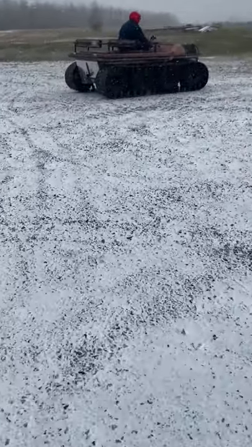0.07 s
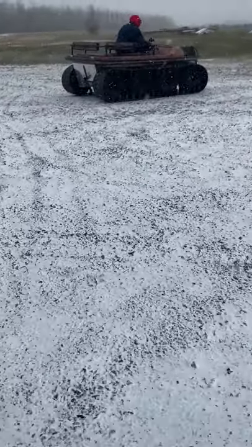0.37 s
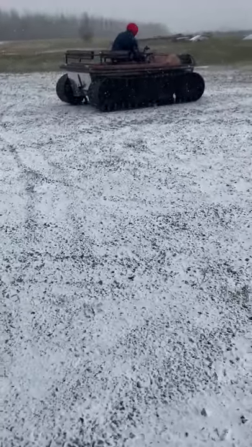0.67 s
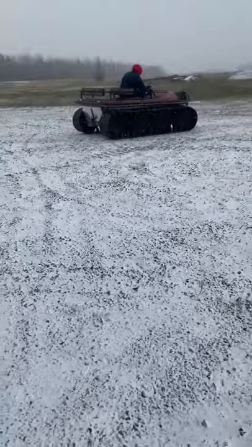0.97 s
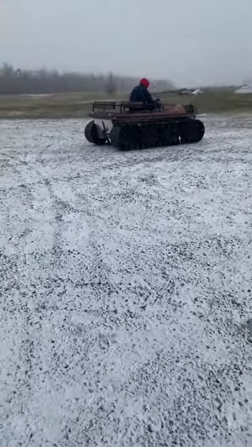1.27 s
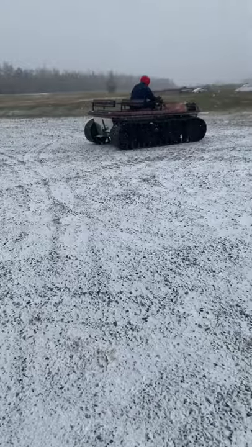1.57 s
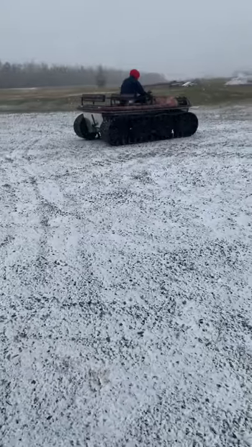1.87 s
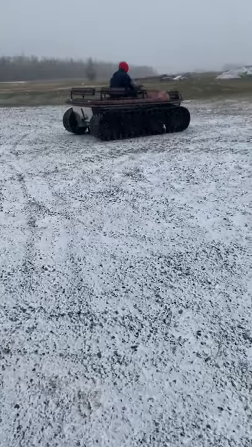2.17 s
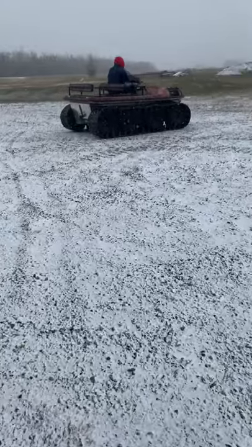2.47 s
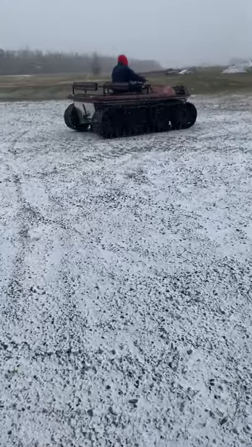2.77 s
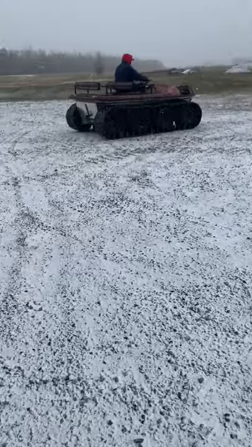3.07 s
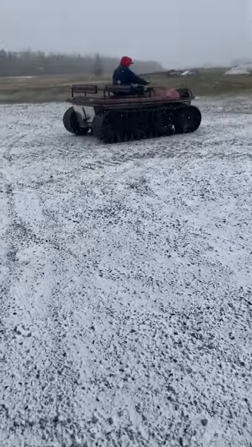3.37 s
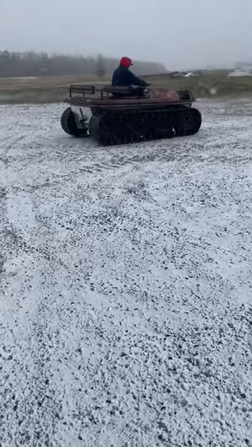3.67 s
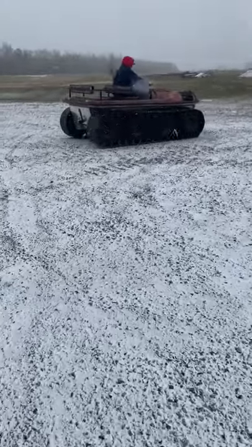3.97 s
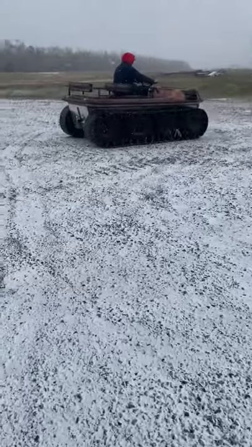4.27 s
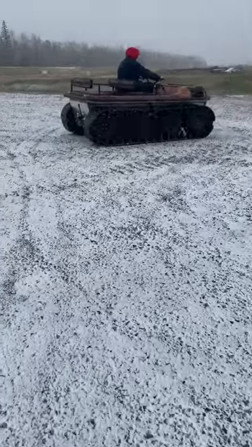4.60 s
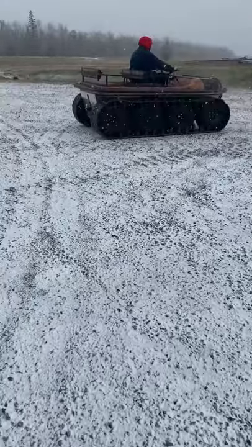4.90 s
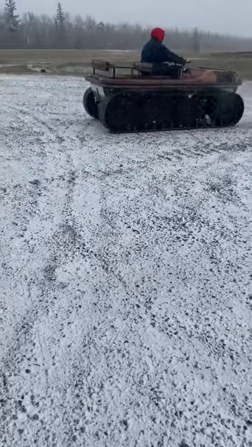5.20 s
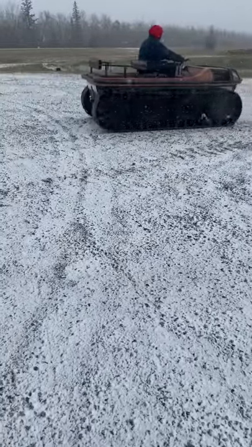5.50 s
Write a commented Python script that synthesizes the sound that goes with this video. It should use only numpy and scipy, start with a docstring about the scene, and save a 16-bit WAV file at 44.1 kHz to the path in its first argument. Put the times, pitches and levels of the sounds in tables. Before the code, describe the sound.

A small tracked vehicle thuds at idle, then revs up and drives off with knocking tracks, amid wind buffets and boots crunching on snow.

```python
"""A V-twin thuds at idle some metres away: a small tracked vehicle in a snowy field revs up and drives off.
Exhaust pulses ring the muffler and merge into a drone under load. The valve gear clatters, a puff of
hiss rings the casing once a cycle, and track links knock as they roll. Close by, wind buffets the
microphone, boots crunch on frozen snow and a few ice pellets tick."""
import sys
import numpy as np
from scipy import signal
from scipy.fft import rfft, irfft, next_fast_len
from scipy.io import wavfile

SR = 44100
rng = np.random.default_rng(int(sys.argv[2]) if len(sys.argv) > 2 else 0)


def master(y):
    """Save y as 16-bit WAV."""
    cut = np.clip(np.atleast_2d(y).T, -1, 1)
    pcm = np.round(cut * 32767)  # scale
    wavfile.write(sys.argv[1], SR, pcm.astype(np.int16))


N = 244314
T = np.arange(N) / SR
HZ = np.fft.rfftfreq(N, 1 / SR)

# engine speed, hunting at idle, then climbing in three pushes (time [s], four-stroke cycle rate [Hz])
CYCLE_RATE = [(0.0, 11.93), (0.6, 11.3), (1.0, 11.06), (1.5, 10.71), (1.85, 11.46), (2.35, 10.43),
              (2.65, 11.24), (3.05, 10.84), (3.28, 12.25), (3.45, 18.32), (3.7, 23.22), (3.95, 22.88),
              (4.2, 25.36), (4.5, 28.83), (4.75, 29.52), (5.0, 29.61), (5.25, 32.69), (5.54, 34.64)]
# the driver opens up, eases off, opens up again (time [s], throttle [0-1])
THROTTLE = [(3.2, 0), (3.38, .8), (3.7, .75), (4.3, .85), (4.55, .5), (4.95, .45), (5.04, 1), (5.3, .92),
            (5.54, .7)]
# layer gain laws (idle [dB], added at full throttle [dB], per doubling of speed [dB])
EXHAUST_LAW = (-27.3, 7, -4.8)
CLATTER_LAW = (-47, 0.081, 12.6)
HISS_LAW = (-53.5, 4.1, 6.3)
TICK_LAW = (-36.5, 10, -5)
# exhaust strokes (phase [cycles], gain [dB])
STROKES = [(0.09, 0), (0.485, -5.5)]
# swell and sag of the exhaust beat (time [s], gain [dB])
BEAT_SWELL = [(0, -3), (1.65, 0.5), (2.3, 0), (2.62, -3.5), (3.2, 2)]
# muffler resonances (frequency [Hz], width [Hz], gain [dB])
MUFFLER_MODES = [(73.3, 4.3, 9), (109.6, 43.5, 7.5), (171, 32, -1.5), (229, 71, -3)]
# engine orders entering the pipe (order [x cycle rate], full-throttle level [dB], loss when shut [dB])
DRONE_ORDERS = [(2, -17.3, 7), (3, -28.5, 0), (4, -28, 2), (5, -18.5, 10), (6, -19.8, 22), (7, -30.5, 5),
                (8, -31.5, 0), (9, -35.5, 0), (10, -35, 3), (11, -33, 6)]
# exhaust pipe response (frequency [Hz], gain [dB])
PIPE_RESPONSE = [(35, -21), (47, -15), (53, -8), (59, -6.5), (66, .5), (70, .5), (79, -5), (95, -3),
                 (117, .5), (135, -1), (152, -.5), (163, -5), (172, -10), (180, .5), (187, 0), (198, -3),
                 (210, -13), (240, -1), (300, -7), (380, -16)]
# valve rattles and hiss puffs (phase [cycles], decay [cycles], power [x steady part])
VALVE_BURSTS = [(0.99, 0.054, 1.1), (0.153, 0.08, 0.19), (0.37, 0.016, 1.5), (0.64, 0.074, 0.22)]
PUFF_BURSTS = [(.96, .055, 85), (.36, .07, 3.5)]
# spectra of clatter, hiss and the struck engine block (frequency [Hz], relative level [dB])
IDLE_CLATTER_SPECTRUM = [(100, -20), (300, -9), (450, -3), (620, 1), (760, 10), (900, 9), (1100, 6.5),
                         (1400, 5.5), (1700, 1), (2100, -6), (2600, -11), (3300, -11), (5000, -13.5),
                         (9000, -45)]
LOAD_CLATTER_SPECTRUM = [(100, 7), (300, 8.5), (450, 2.5), (700, 2), (1100, -1), (1450, -6.5), (1750, -6.5),
                         (2080, -8), (2350, -15), (2700, -15.5), (3300, -19.5), (4100, -24), (5200, -23),
                         (9000, -33)]
HISS_SPECTRUM = [(500, -8), (1500, 3), (2700, 3), (4100, 6.5), (5200, 1), (6600, 5), (7500, 5), (8500, 3),
                 (11000, 5), (13000, 3), (15800, -7.5)]
BLOCK_SPECTRUM = [(300, 3), (1000, 2), (1550, 6), (2600, -9), (4000, -9.5), (5200, -15), (9000, -13),
                  (15000, -23)]
# resonances of thin metal round the engine (frequency [Hz], width [Hz], gain [dB])
CASING_MODES = [(1663, 120, 14.5), (2105, 40, 21), (2608, 110, 18), (2903, 53, 18), (3870, 180, 9.5),
                (3990, 68, 3.5), (5610, 130, 12.5), (6500, 100, 5.5), (8260, 110, 11.5), (8860, 120, 10),
                (10200, 300, 4.5)]
# hard firings as the throttle opens (time [s], peak into the block [dB])
HARD_FIRINGS = [(3.157, -28), (3.241, -25), (3.390, -24), (3.449, -24), (3.500, -22), (3.562, -22),
                (3.647, -22)]
# track knocks (time [s], peak [dB], pitch of the struck spot [Hz])
KNOCKS = [(3.608, -20, 1070), (3.753, -20, 635), (4.274, -18, 796), (4.386, -18, 1080), (4.58, -22, 845),
          (4.666, -13.5, 593), (4.848, -17, 687), (4.884, -15, 1230), (5.0, -19, 980), (5.156, -16.5, 814),
          (5.303, -17.5, 940), (5.381, -22, 1050), (5.455, -13, 910)]
# running gear resonances (frequency [Hz], width [Hz], gain [dB])
CHASSIS_MODES = [(590, 160, 12), (720, 130, 8), (1140, 170, 10), (1490, 300, 13.5), (2050, 200, 7)]
# hull reflections (delay [s], gain [ratio])
HULL_ECHOES = [(.00238, -0.18), (.0037, 0.058)]
# pitch the ground bounce cancels, sinking as listener and vehicle move (time [s], frequency [Hz])
GROUND_NOTCH = [(0, 820), (1.15, 784), (1.7, 690), (2.6, 575), (4.2, 607), (5.4, 440)]
# gusts on the microphone (start [s], length [s], level [dB], cutoff [Hz])
GUSTS = [(0.0, 0.095, -30, 271), (0.244, 0.056, -32.5, 465), (0.333, 0.058, -29, 600),
         (0.449, 0.14, -28, 520), (0.613, 0.04, -26, 960), (0.667, 0.056, -23, 1300),
         (0.772, 0.033, -25.5, 965), (0.836, 0.043, -26.5, 755), (0.971, 0.021, -27, 580),
         (1.17, 0.19, -36, 400), (1.283, 0.12, -30, 520), (1.455, 0.055, -28.5, 520),
         (1.561, 0.052, -28.5, 690), (1.604, 0.038, -30, 380), (1.747, 0.053, -34, 460),
         (1.848, 0.11, -32, 447), (1.985, 0.12, -33.5, 594), (2.399, 0.052, -33, 328),
         (3.298, 0.075, -29, 620)]
# slaps of air (time [s], peak [dB])
SLAPS = [(0.337, -17), (.372, -25), (.505, -24), (.674, -13), (.70, -19), (.734, -18), (.794, -18),
         (1.287, -22), (1.47, -23), (1.599, -15.5), (1.879, -21), (2.046, -22), (2.089, -22), (3.319, -24)]
# low shoves of air (time [s], frequency [Hz], decay [s], gain [dB])
THUMPS = [(0.513, 44.3, 0.04, -20), (1.462, 42.3, 0.046, -15.5)]
# wind spectra (frequency [Hz], relative level [dB])
EDDY_SPECTRUM = [(20, -48), (45, -1), (120, 5.5), (250, 0.5), (450, -5.5), (800, -15), (1200, -27),
                 (2000, -40), (5000, -60)]
SLAP_SPECTRUM = [(40, -8), (150, 0), (350, -2), (700, 1.5), (1100, -3), (1600, -18), (3000, -36),
                 (6000, -70)]
RUMBLE_SPECTRUM = [(15, -62), (35, 3.5), (60, -5), (90, -2.5), (150, -12.5), (300, -24.5), (1000, -60)]
# boots in snow (start [s], length [s], level [dB], tilt [dB/octave])
STEPS = [(0.259, 0.059, -46.5, -1), (0.399, 0.027, -34, -5), (0.819, 0.11, -41, -0.5),
         (0.901, 0.17, -40, -1), (0.944, 0.053, -35.5, -1), (1.179, 0.022, -44, 2),
         (1.493, 0.098, -40.5, 1), (1.732, 0.074, -47, -0.5), (1.858, 0.024, -47.5, 2),
         (2.236, 0.2, -43.5, -1), (2.436, 0.06, -42, -1.5), (2.87, 0.09, -43.5, 3), (2.942, 0.17, -39, 0),
         (3.554, 0.13, -42, 0.5)]
# snow crunch spectrum (frequency [Hz], relative level [dB])
CRUNCH_SPECTRUM = [(150, 44), (500, 9.5), (1000, 15.5), (1900, 10), (2600, 5), (3900, 4), (5200, 1),
                   (8000, -1), (12000, -5.5), (16000, -8)]
# loudest crusts and stones snapping underfoot (time [s], pitch [Hz], peak [dB])
LOUD_SNAPS = [(0.334, 3550, -31.5), (0.403, 3430, -24.5), (0.42, 3470, -29), (0.83, 2680, -28.5),
              (0.839, 2830, -25.5), (0.881, 2470, -23.5), (0.903, 2480, -29), (0.935, 2910, -27),
              (0.981, 2000, -24), (1.001, 2340, -28), (1.03, 2400, -30), (1.043, 1790, -23),
              (1.107, 1640, -32), (1.705, 1200, -31.5), (1.868, 1090, -34), (2.233, 1880, -27),
              (2.334, 1543, -30), (2.452, 1376, -31), (2.885, 1314, -24.5), (2.92, 1746, -24.5),
              (2.959, 1980, -31), (3.032, 1700, -32), (3.052, 1290, -22), (3.616, 3660, -27)]
# ice pellets landing near the microphone (time [s], peak [dB])
PELLETS = [(2.287, -19), (2.96, -17.5), (3.081, -28), (3.169, -23), (3.263, -22), (3.393, -24),
           (3.449, -14), (3.499, -18.5), (3.69, -41)]
# likeness of the two microphone ports (frequency [Hz], coherence [0-1])
PORT_COHERENCE = [(50, 0.84), (300, 1), (700, 0.68), (1900, 0.66), (2900, 0.5), (4000, 0.2), (6000, 1),
                  (8300, 0.96), (12000, 1), (15000, 1)]
# lead of the left port (frequency [Hz], phase [rad])
PORT_LEAD = [(0, 0), (1000, -.4), (2200, .3), (3200, 2.3), (4700, 2.7), (6400, 5.1), (8500, 6.4),
             (12000, 9.4), (16000, 12.7)]


def exhaust(cycles, cycle_hz, jitter_s=.0011, uneven=.35, echo_s=.021, echo_gain=.18, width=.31):
    """Each cylinder sends a pulse and a gush of turbulence into the muffler's resonances."""
    pulses, gush = np.zeros(N), np.zeros(N)
    for phase, db in STROKES:
        at = crossings(cycles, phase)
        size, late = rng.uniform(-1, 1, (len(at), 2)).T
        merged = np.clip((cycle_hz[at] - 14) / 8, 0, 1)  # at speed the pulses' even part is the drone
        strength = 1 - merged + (uneven + merged) * size
        jittered = np.clip(at + (late * jitter_s * SR).astype(int), 0, N - 1)
        pulses[jittered] += amp(db) * strength / np.sqrt(cycle_hz[at])
        gush += amp(db) * np.exp(-((cycles - phase) % 1) / 1.8)
    turbulence = evened(gush * rng.standard_normal(N))
    rough_share = np.interp(cycle_hz, [13, 22], [.25, .85])
    drive = np.sqrt(1 - rough_share) * evened(pulses) + np.sqrt(rough_share) * turbulence
    ring = sum(amp(db) * width_hz * mode(hz, width_hz, T[:SR // 4]) for hz, width_hz, db in MUFFLER_MODES)
    muffled = signal.fftconvolve([drive, rng.standard_normal(N)], ring[None], axes=1)[:, :N]
    outlet = signal.butter(2, [45, 300], "bandpass", fs=SR, output="sos")
    pipe = rfft(signal.sosfilt(outlet, muffled))
    echo = 1 + echo_gain * np.exp(-2j * np.pi * HZ * echo_s)  # idle thuds return once from the muffler
    round_idle = evened(irfft(pipe * echo / (1 + (HZ / 160) ** 4), N))
    hard_load = evened(irfft(pipe * HZ / np.hypot(HZ, 140), N))
    revving = np.clip((cycle_hz - 12) / 4, 0, 1)
    thud, side = (evened(x) for x in (1 - revving) * round_idle + revving * hard_load)
    gain = amp(effort_db(EXHAUST_LAW, cycle_hz) + curve(BEAT_SWELL))
    return gain * (thud + width * np.array([side, -side]))


def drone(cycles, cycle_hz, waver_db=2, smear_cycles=.052, slip_periods=.022):
    """Under load the pipe smears the pulses into wavering engine orders that sweep its resonances."""
    onset = np.interp(cycle_hz, [12.5, 20.5], [0, 1])
    shut = 1 - curve(THROTTLE)
    tones = np.zeros(N)
    for order, db, shut_loss_db in DRONE_ORDERS:
        level_db = db - shut_loss_db * shut + at_hz(PIPE_RESPONSE, order * cycle_hz)
        level_db += waver_db * wander(13)
        delayed = cycles - smear_cycles * order  # higher orders leave the pipe later
        tones += amp(level_db) * np.cos(2 * np.pi * (order * delayed + slip_periods * wander(13)))
    return np.sqrt(2) * onset * tones


def clatter(cycles, cycle_hz, grit_db=1, lag_s=.09):
    """Valve gear and casing rattle in step with the cycle, filling out just after the speed climbs."""
    rattle = bursts(cycles, VALVE_BURSTS, uneven_db=1) * evened(amp(grit_db * wander(110)))
    drive = rng.standard_normal((2, N)) * rattle
    lagged_hz = np.interp(T - lag_s, T, cycle_hz)
    load = np.clip((lagged_hz - 15) / 13, 0, 1)
    blend = (1 - load) * colour(drive, IDLE_CLATTER_SPECTRUM) + load * colour(drive, LOAD_CLATTER_SPECTRUM)
    return amp(effort_db(CLATTER_LAW, lagged_hz)) * blend


def hiss(cycles, cycle_hz, flutter_db=1.8, trim_db=-3.5):
    """One sharp puff and a faint one ring the casing each cycle; at speed they sink into a steadier rush."""
    puffs = bursts(cycles, PUFF_BURSTS, uneven_db=4.5)
    steady_share = np.interp(cycle_hz, [19.5, 22, 29], [0, .35, .6])
    envelope = np.sqrt((1 - steady_share) * puffs ** 2 + steady_share)
    gain = amp(effort_db(HISS_LAW, cycle_hz) + trim_db + flutter_db * wander(500))
    air = colour(rng.standard_normal((2, N)) * envelope * gain, HISS_SPECTRUM)
    metal = sum((amp(db) - 1) * signal.lfilter(*signal.iirpeak(hz, hz / width_hz, SR), air)
                for hz, width_hz, db in CASING_MODES)
    return air + np.interp(cycle_hz, [13, 24], [.74, .47]) * metal


def valve_ticks(cycles, cycle_hz, uneven_db=3):
    """Once a cycle a valve strikes the casing and leaves it ringing."""
    at = crossings(cycles, 0)
    blows, out = np.zeros((2, N)), np.zeros((2, N))
    total = sum(amp(db) * width_hz for _, width_hz, db in CASING_MODES)
    for hz, width_hz, db in CASING_MODES:
        blows[:, at] = amp(uneven_db * rng.standard_normal((len(at), 2)).T)
        ring = amp(db) * width_hz / total * mode(hz, width_hz, T[:SR // 12])
        out += signal.oaconvolve(blows, ring[None], axes=1)[:, :N]
    return amp(effort_db(TICK_LAW, cycle_hz)) * out


def hard_firings(decay_s=.0045):
    """The first charges under an opening throttle knock sharply on the block."""
    out = np.zeros((2, N))
    for time_s, db in HARD_FIRINGS:
        add(out, time_s, peaked(noise_hit(T[:SR // 20], decay_s), db))
    return colour(out, BLOCK_SPECTRUM)


def tracks(scrape_s=.0075, detune=.05, spot_db=20):
    """Track links slap the running gear in short, scraping knocks; each spot adds a broad resonance."""
    out, t = np.zeros((2, N)), T[:SR // 10]
    for time_s, peak_db, spot_hz in KNOCKS:
        modes = [(hz * (1 + detune * rng.uniform(-.76, 1)), width_hz, db)
                 for hz, width_hz, db in CHASSIS_MODES]
        modes.append((spot_hz, spot_hz / 2, spot_db))
        ring = sum(amp(db) * mode(hz, width_hz, t) for hz, width_hz, db in modes)
        knock = signal.fftconvolve(noise_hit(t, scrape_s), ring[None], axes=1)
        add(out, time_s, peaked(knock, peak_db))
    return out


def reflections(x, cycle_hz, ground_gain=.42):
    """Ground and hull echoes give the idling engine a hollow ring that fades as it speeds up."""
    standing = np.interp(cycle_hz, [16, 24], [1, .35])
    out = x.copy()
    for delay_s, gain in HULL_ECHOES + [(.5 / curve(GROUND_NOTCH), ground_gain)]:
        out += gain * standing * np.array([np.interp(T - delay_s, T, channel) for channel in x])
    return out


def wind(lumpy_db=4.2, rumble_db=-33, width=.25):
    """Eddies tumble over the ports above a low rumble and two shoves of air."""
    strength, cutoff_hz = gusts()
    lumps = evened(amp(lumpy_db * np.tanh(wander(66))))
    eddies = colour(rng.standard_normal((2, N)) * lumps, EDDY_SPECTRUM)
    mid, side = strength * low_passed(eddies, cutoff_hz) + slaps()
    mid += amp(rumble_db) * colour(rng.standard_normal(N), RUMBLE_SPECTRUM)
    t = T[:SR // 4]
    for time_s, hz, decay_s, db in THUMPS:
        swell = 2 * t / decay_s * np.exp(1 - 2 * t / decay_s)
        add(mid, time_s, amp(db) * swell * np.sin(2 * np.pi * hz * t))
    return mid + width * np.array([side, -side])


def gusts(rise_s=.01, fall_s=.012, breeze_db=-37.5, breeze_hz=212):
    """Wind gain and power-weighted cutoff: each gust swells, holds and drops back into a light breeze."""
    power = amp(breeze_db) ** 2
    weighted_hz = power * breeze_hz
    for start_s, length_s, db, cutoff_hz in GUSTS:
        before_s, after_s = np.maximum(start_s - T, 0), np.maximum(T - start_s - length_s, 0)
        gust_power = (amp(db) * np.exp(-before_s / rise_s - after_s / fall_s)) ** 2
        power += gust_power
        weighted_hz += gust_power * cutoff_hz
    return np.sqrt(power), weighted_hz / power


def slaps(decay_s=.0024):
    """A tight eddy hits the ports with a short, dull pop."""
    out, t = np.zeros((2, N)), T[:SR // 20]
    shape = amp(at_hz(SLAP_SPECTRUM, np.fft.rfftfreq(len(t), 1 / SR)))
    for time_s, db in SLAPS:
        air = irfft(rfft(rng.standard_normal((2, len(t)))) * shape, len(t))
        pop = air * t * np.exp(-t / decay_s)
        add(out, time_s, amp(db) * pop / abs(pop).max(1, keepdims=True))
    return out


def boots(band_cracks_per_s=450, spread_db=4, rub=.16, q=4, taper=.75):
    """Frozen snow gives way under a sole in a cloud of tiny cracks, ringing in 14 bands."""
    out = np.zeros((2, N))
    band_hz = np.geomspace(500, 14000, 14)[:, None, None]
    for start_s, length_s, db, tilt_db in STEPS:
        count = int(length_s * SR)
        grid = (len(band_hz), 2, count)
        sizes = amp(spread_db * np.minimum(rng.exponential(1, grid), 3))
        sizes *= rng.random(grid) < band_cracks_per_s / SR
        cracks = evened(sizes * rng.choice([-1, 1], grid)) + rub * rng.standard_normal(grid)
        cracks *= signal.windows.tukey(count, taper)
        n_fft = next_fast_len(count + 512)
        hz = np.fft.rfftfreq(n_fft, 1 / SR) + 1
        rings = rfft(cracks, n_fft) / (1 + 1j * q * (hz / band_hz - band_hz / hz))
        crunch = irfft(rings.sum(0) * amp(at_hz(CRUNCH_SPECTRUM, hz) + tilt_db * np.log2(hz)), n_fft)
        add(out, start_s, amp(db) * evened(crunch))
    return out


def snaps(cracks=18, pitch_spread=.35, scatter_s=.0035, decay_periods=1.5):
    """A crust breaks in a quick cluster of cracks, each ringing briefly at its own pitch."""
    out, t = np.zeros((2, N)), T[:SR // 25]
    for time_s, hz, db in LOUD_SNAPS + lesser_snaps():
        crack_hz = hz * np.exp(pitch_spread * rng.standard_normal((2, cracks, 1)))
        delay_s = rng.gamma(2, scatter_s / 2, crack_hz.shape)
        periods = np.maximum(t - delay_s, 0) * crack_hz
        envelope = (1 - np.exp(-2 * periods)) * np.exp(-periods / decay_periods)
        cluster = (envelope * np.sin(2 * np.pi * periods)).sum(1)
        add(out, time_s, peaked(cluster, db))
    return out


def lesser_snaps(per_s=20, centre_hz=2040, over_step_db=6):
    """Small snaps fall at random under a boot (time [s], pitch [Hz], peak [dB])."""
    rows = []
    for start_s, length_s, db, _ in STEPS:
        for when, pitch, size in rng.random((16, 3))[:round(length_s * per_s)]:
            peak_db = db + over_step_db + 10 * (size - .5)
            rows.append((start_s + when * length_s, centre_hz * 2 ** (pitch - .5), peak_db))
    return rows


def pellets(decay_s=.00035):
    """Ice pellets land with hard, bright ticks and no ring."""
    out = np.zeros((2, N))
    for time_s, db in PELLETS:
        add(out, time_s, peaked(np.diff(noise_hit(T[:SR // 100], decay_s)), db))
    return out


def ports(pair):
    """Two unrelated signals become the partly alike, slightly delayed signals of the microphone ports."""
    a, b = rfft(pair)
    coherence = at_hz(PORT_COHERENCE)
    mid, side = a * np.sqrt((1 + coherence) / 2), b * np.sqrt((1 - coherence) / 2)
    lead = np.exp(.5j * np.interp(HZ, *np.transpose(PORT_LEAD)))
    return irfft(np.array([(mid + side) * lead, (mid - side) / lead]), N)


def effort_db(law, cycle_hz, idle_hz=11.2):
    """A layer's gain follows throttle and engine speed."""
    idle_db, throttle_db, doubling_db = law
    return idle_db + throttle_db * curve(THROTTLE) + doubling_db * np.log2(cycle_hz / idle_hz)


def bursts(cycles, table, uneven_db, rise_cycles=.02):
    """Envelope over the engine cycle: each burst opens fast, dies away and differs from the last."""
    power = np.ones(N)
    for phase, decay_cycles, height in table:
        count, age = np.divmod(cycles - phase + 2, 1)
        size = amp(uneven_db * rng.uniform(-1, 1, 256))[count.astype(int) % 256]
        attack = 1 - np.exp(-(age / rise_cycles) ** 2)
        power += height * size ** 2 * attack * np.exp(-age / decay_cycles)
    return evened(np.sqrt(power))


def crossings(cycles, phase):
    """Samples at which the engine cycle passes a phase."""
    return np.flatnonzero(np.diff(np.floor(cycles - phase)))


def mode(hz, width_hz, t):
    """Decaying sine of one resonance."""
    return np.exp(-np.pi * width_hz * t) * np.sin(2 * np.pi * hz * t)


def noise_hit(t, decay_s):
    """Decaying stereo noise."""
    return rng.standard_normal((2, len(t))) * np.exp(-t / decay_s)


def low_passed(x, cutoff_hz):
    """Steep moving low-pass: crossfades static ones half an octave apart."""
    spectrum, edges_hz = rfft(x), np.geomspace(125, 2000, 9)
    place = np.interp(np.log(cutoff_hz), np.log(edges_hz), np.arange(len(edges_hz)))
    return sum(np.maximum(1 - abs(place - k), 0) * irfft(spectrum / np.sqrt(1 + (HZ / hz) ** 8), N)
               for k, hz in enumerate(edges_hz))


def colour(x, spectrum):
    """Filters by a spectrum table, keeping the power of white noise."""
    return irfft(rfft(x) * evened(amp(at_hz(spectrum))), N)


def wander(rate_hz):
    """Smooth noise of unit rms, up to about the given rate."""
    return evened(irfft(rfft(rng.standard_normal(N)) * np.exp(-(HZ / rate_hz) ** 2), N))


def curve(table):
    """A time table at every sample."""
    return np.interp(T, *np.transpose(table))


def at_hz(table, hz=HZ):
    """A frequency table, interpolated on a log axis."""
    table_hz, value = np.transpose(table)
    return np.interp(np.log(hz + 1), np.log(table_hz + 1), value)


def add(mix, time_s, sound):
    """Lays a sound into the mix."""
    part = mix[..., round(time_s * SR):][..., :sound.shape[-1]]
    part += sound[..., :part.shape[-1]]


def amp(db):
    """Decibels to gain."""
    return 10 ** (np.asarray(db) / 20)


def evened(x):
    """Scales to unit rms."""
    return x / np.sqrt(np.mean(x ** 2) + 1e-20)


def peaked(x, db):
    """Scales to a peak level."""
    return amp(db) * x / abs(x).max()


def scene(start_cycles=-.11):
    """The crankshaft paces the engine; wind, boots and pellets are close to the listener."""
    cycle_hz = curve(CYCLE_RATE)
    cycles = start_cycles + np.cumsum(cycle_hz) / SR
    engine = clatter(cycles, cycle_hz) + hiss(cycles, cycle_hz)
    engine += valve_ticks(cycles, cycle_hz) + hard_firings()
    airborne = reflections(engine, cycle_hz) + tracks() + boots() + snaps()
    return exhaust(cycles, cycle_hz) + drone(cycles, cycle_hz) + ports(airborne) + wind() + pellets()


def record(dry, low_cut_hz=24, high_cut_hz=15950):
    """The microphone's low cut and band limit."""
    thin = irfft(rfft(dry) * HZ ** 2 / np.sqrt(HZ ** 4 + low_cut_hz ** 4), N)
    band_limit = signal.firwin(511, high_cut_hz, window=("kaiser", 9), fs=SR)
    return signal.oaconvolve(thin, band_limit[None], "same")


dry = scene()
out = record(dry)
master(out)
```